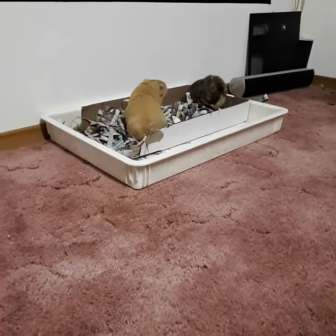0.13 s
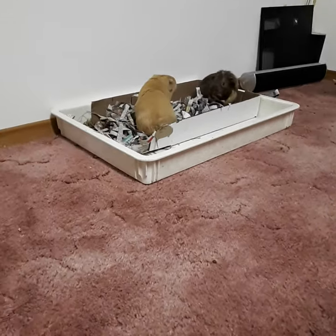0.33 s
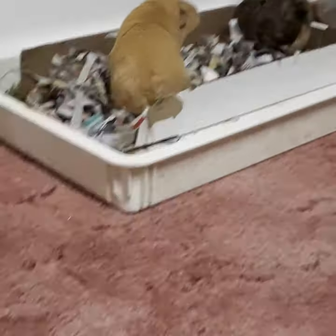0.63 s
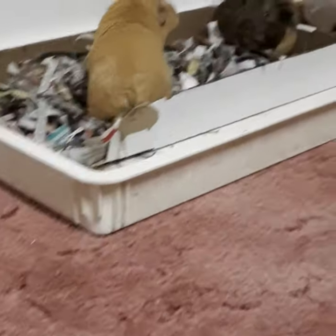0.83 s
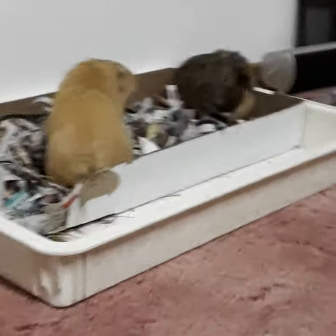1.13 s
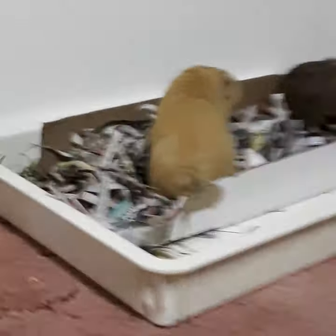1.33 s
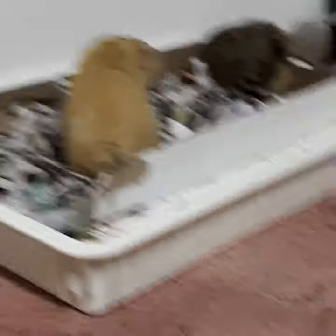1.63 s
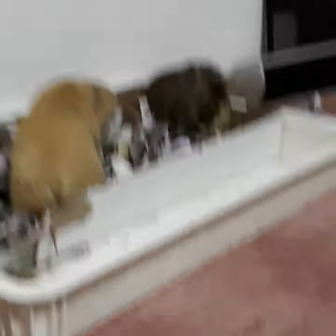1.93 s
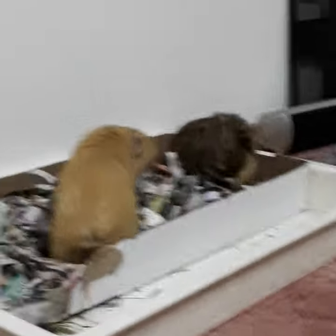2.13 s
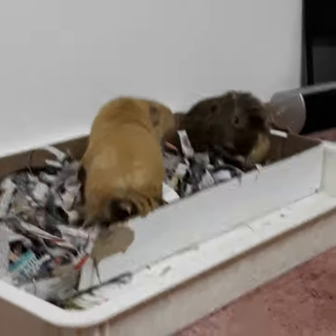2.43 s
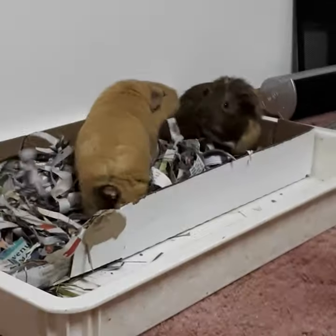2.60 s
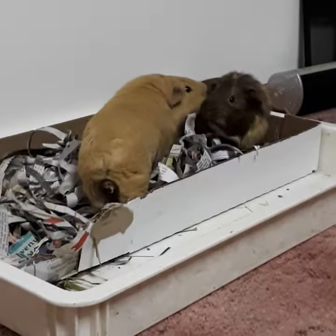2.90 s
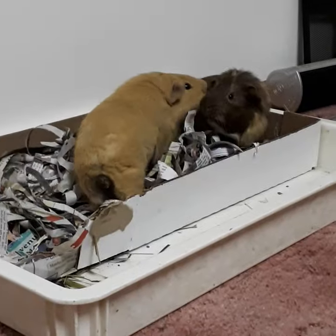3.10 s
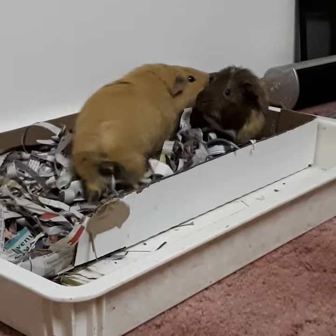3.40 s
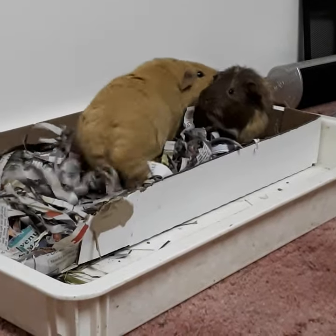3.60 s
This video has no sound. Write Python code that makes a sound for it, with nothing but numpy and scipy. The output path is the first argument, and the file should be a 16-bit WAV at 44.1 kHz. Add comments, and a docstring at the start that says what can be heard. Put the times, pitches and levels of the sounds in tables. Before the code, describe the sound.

Paper rustling and rapid crisp nibbling come from guinea pigs in a plastic tray; tiny snaps first, later little calls and foot bumps, finally a crackling scuffle, over faint indoor rumble and microphone hiss.

```python
"""A quiet carpeted room: two guinea pigs shift about in a plastic tray of shredded newspaper.
Nibbling, roughly ten bites a second, is bursts of fibre grains, each a crisp crunch over a hollow knock.
Grain beds rustle, narrow bands of grains scrape, clicks snap, and a few soft chuts are gliding raspy tones.
Decaying modes ring as the tray is bumped, and the rustle swells at the end as both animals scuffle.
A hand brushes the microphone in a swell of hiss, over rumble, a faint hum and steady hiss."""
import sys
import numpy as np
from scipy import signal
from scipy.fft import rfft, irfft, next_fast_len
from scipy.io import wavfile
from scipy.ndimage import uniform_filter1d, map_coordinates

SR = 44100
rng = np.random.default_rng(int(sys.argv[2]) if len(sys.argv) > 2 else 0)


def to_wav(sig):
    """Store sig (one row per channel, or 1-D mono) as 16-bit WAV at the path in sys.argv[1].

    Samples outside -1..1 are clipped; the rate is SR.
    """
    pcm = np.clip(np.atleast_2d(sig), -1, 1) * 32767
    pcm = np.round(pcm).astype(np.int16)
    wavfile.write(sys.argv[1], SR, pcm.T)  # frames by channels


N = 165375
T = np.arange(N) / SR  # time of each sample [s]


def amp(db):
    """Decibels to gain."""
    return 10 ** (np.asarray(db) / 20)


def unit(x):
    """Scale to rms 1."""
    return x / np.sqrt(np.mean(x ** 2) + 1e-20)


def along(points, hz):
    """Read (frequency [Hz], value) points on a log frequency axis."""
    frequencies, values = np.transpose(points)
    return np.interp(np.log(hz + 1), np.log(frequencies + 1), values)


def level(rows):
    """Gain envelope per sample from (time [s], level [dB]) rows."""
    return amp(np.interp(T, *np.transpose(rows)))


def wobble(rate):
    """A smooth random curve with rate knots a second."""
    knots = rng.standard_normal(int(N * rate / SR) + 4)
    return map_coordinates(knots, [T * rate])


def filtered(x, response):
    """Shape the spectrum of x by a gain that depends on frequency."""
    size = next_fast_len(N + SR // 2)
    spectrum = rfft(x, size) * response(np.fft.rfftfreq(size, 1 / SR))
    return irfft(spectrum, size)[..., :N]


def colour(x, points, size=2048):
    """EQ by a causal, minimum-phase filter of unit energy with the given spectrum."""
    cepstrum = irfft(np.log(amp(along(points, np.fft.rfftfreq(size, 1 / SR)))))
    # folding the cepstrum forward in time makes the filter causal
    cepstrum[1:size // 2] *= 2
    cepstrum[size // 2 + 1:] = 0
    impulse = irfft(np.exp(rfft(cepstrum)))
    return signal.fftconvolve(x, impulse[None] / np.linalg.norm(impulse), axes=1)[:, :N]


def spread(pair, width, left_db):
    """Pan two signals as middle and side; left_db leans the image to the left."""
    mid, side = pair
    balance = amp([[left_db / 2], [-left_db / 2]])
    return np.array([mid + width * side, mid - width * side]) * balance


def grains(rate, scatter_db, smooth):
    """Tiny fibre clicks of uneven size over smooth friction noise, as middle and side."""
    hits = rng.random(N) < rate / SR
    sizes = hits * amp(scatter_db * np.minimum(rng.exponential(size=N), 4))
    clicks = unit(sizes * rng.standard_normal((2, N)))
    return unit(clicks + smooth * rng.standard_normal((2, N)))


def patchy(x, depth_db):
    """Random patches of time and frequency shift the colour from strip to strip."""
    z = signal.stft(x, nperseg=512)[2]
    field = uniform_filter1d(rng.standard_normal(z.shape[1:]), size=7, axis=0)
    field = uniform_filter1d(field, size=9, axis=1)
    return signal.istft(z * amp(depth_db * unit(field)), nperseg=512)[1][:, :N]


def burst(s, attack, hold, t60):
    """Envelope from time s: exponential attack, then release after the hold, all in seconds."""
    t = np.maximum(T - s, 0)
    return (1 - np.exp(-t / attack)) * amp(-60 * np.maximum(t - hold, 0) / t60)


def crumple(depth_db):
    """Fibres give way in clumps a few milliseconds long, with softer gaps between."""
    return unit(amp(depth_db * np.tanh(wobble(260))))


# bites before the layer trims: (time [s], crunch level [dB], hollow knock level [dB])
BITE_TIMES = [(0.014, -54, -69.5), (0.098, -50.5, -70.5), (0.186, -53, -78), (.27, -59, -87),
              (0.35, -54.5, -75.5), (.436, -55.5, -64), (0.495, -56.5, -65.5), (.532, -62, -83),
              (0.628, -57.5, -71), (0.659, -65, -77), (0.731, -54.5, -62.5), (0.826, -53.5, -63),
              (.931, -54, -64), (1.037, -53.5, -65.5), (1.164, -54, -62.5), (1.263, -62, -67),
              (1.379, -55.5, -65), (1.499, -59.5, -66), (1.626, -64.5, -67.5), (1.755, -60.5, -65.5),
              (1.795, -59, -88), (1.865, -58.5, -68), (1.962, -59, -61.5), (2.015, -74, -65),
              (2.069, -57, -66.5), (2.146, -67, -62.5), (2.264, -58, -61.5), (2.36, -56, -65),
              (2.397, -60.5, -82), (2.485, -73, -72), (2.524, -57.5, -69), (2.6, -59, -72),
              (2.641, -59, -68.5), (2.876, -68, -71), (2.98, -69, -63), (3.098, -61, -66),
              (3.213, -58, -62.5), (3.319, -64, -62), (3.427, -58, -65), (3.64, -61, -66),
              (3.68, -70, -64.5)]
# spectrum of the crisp crunch: (frequency [Hz], relative level [dB])
CRUNCH_COLOUR = [(1500, -33.5), (4000, -24.5), (5800, -13.5), (6800, -6.5), (7400, 1), (7950, -4.5),
                 (8700, -17.5), (11000, -23.5), (15800, -13)]
# hollow spectrum, shared by knocks, feet and tray scuffs: (frequency [Hz], relative level [dB])
HOLLOW_COLOUR = [(150, -29.5), (330, -5), (520, 0), (720, 1.5), (1000, -1.5), (1350, -6), (1650, -13),
                 (2500, -21.5), (5000, -31)]


def nibbling():
    """Each bite is a short crunch of tiny fractures with a soft hollow knock."""
    crisp = sum(amp(db) * burst(s, attack=0.0024, hold=0.014, t60=0.2) for s, db, _ in BITE_TIMES)
    dull = sum(amp(db) * burst(s, attack=0.0021, hold=0.022, t60=0.13) for s, _, db in BITE_TIMES)
    crunch = colour(crisp * grains(rate=1800, scatter_db=0, smooth=0.6), CRUNCH_COLOUR)
    knock = colour(dull * grains(rate=2000, scatter_db=-1, smooth=1.0), HOLLOW_COLOUR)
    crunch = amp(-6.5) * spread(crunch, width=0.66, left_db=3.5)
    return crunch + amp(-2.0) * spread(knock, width=0.11, left_db=1.0)


# paper rustle envelopes, middle and treble, before trims: (time [s], level [dB])
RUSTLE_MID_LEVEL = [(0.0, -70), (0.152, -78.5), (0.216, -71), (0.315, -75.5), (0.438, -68.5), (.56, -75),
                    (0.668, -74.5), (0.738, -69), (1.034, -76), (1.05, -75), (1.08, -70), (1.188, -67),
                    (1.226, -70), (1.366, -68.5), (1.372, -74), (1.47, -71.5), (1.504, -65.5), (1.652, -77),
                    (1.846, -68), (1.952, -69.5), (1.988, -64.5), (2.06, -68.5), (2.12, -61.5),
                    (2.27, -65.5), (2.34, -65), (2.432, -70), (2.464, -62), (2.552, -66.5), (2.62, -63.5),
                    (2.694, -69), (2.746, -77), (2.768, -69.5), (2.95, -70.5), (3.06, -75), (3.296, -67),
                    (3.412, -71.5), (3.448, -56), (3.48, -68), (3.606, -56), (3.645, -58), (3.675, -57),
                    (3.694, -60.5), (3.75, -58.5)]
RUSTLE_TREBLE_LEVEL = [(0, -69.5), (.08, -77), (.11, -66), (.17, -64), (.2, -62.5), (.255, -63.5),
                       (.285, -62), (.335, -70), (.36, -66.5), (0.4, -65.5), (0.45, -68), (0.59, -77),
                       (0.68, -67), (0.72, -70.5), (0.85, -67), (0.99, -73), (1.22, -65), (1.4, -67),
                       (1.43, -71.5), (1.7, -78), (1.97, -68), (1.99, -62), (2.04, -69.5), (2.21, -66),
                       (2.44, -70.5), (2.47, -62), (2.55, -67), (2.61, -58), (2.7, -74.5), (2.75, -74),
                       (2.78, -70), (2.85, -72.5), (3.01, -76), (3.04, -66.5), (3.06, -70.5), (3.19, -70.5),
                       (3.23, -63), (3.35, -68.5), (3.4, -71.5), (3.45, -65), (3.505, -65), (3.53, -60.5),
                       (3.59, -58.5), (3.71, -60), (3.75, -65)]
# feet shuffling on the tray floor, before trim: (time [s], level [dB])
SHUFFLE_LEVEL = [(0.0, -76), (0.18, -76.5), (.45, -68.5), (.58, -76), (0.72, -71), (1.07, -74),
                 (1.3, -73.5), (1.6, -71), (1.73, -72.5), (1.86, -64.5), (2.03, -68.5), (2.15, -64.5),
                 (2.22, -64.5), (2.33, -73), (2.44, -66), (2.53, -68), (2.66, -69.5), (2.76, -74.5),
                 (2.92, -78), (3.01, -69), (3.08, -75), (3.17, -75), (3.28, -67), (3.41, -78),
                 (3.54, -65.5), (3.67, -60.5), (3.75, -65)]
# spectra of the middle and treble rustle: (frequency [Hz], relative level [dB])
MID_COLOUR = [(700, -23.5), (1300, -9.5), (2200, -2.5), (3200, -0.5), (4200, 2), (5500, -0.5), (7000, -2),
              (9000, -26.5)]
TREBLE_COLOUR = [(3000, -23.5), (5500, 0), (6600, 3), (7450, 10.5), (7900, 8), (8600, -3.5), (10000, -1),
                 (12000, 1.5), (15800, 3.5)]


def rustle():
    """Shredded paper crinkles under the animals, whose feet shuffle on the tray."""
    mid = patchy(grains(rate=3000, scatter_db=-0.5, smooth=1.0), depth_db=1.5)
    mid = colour(mid, MID_COLOUR) * level(RUSTLE_MID_LEVEL)
    mid = mid * amp(-1.0 + 2.17 * wobble(45)) * crumple(depth_db=0.5)

    treble = colour(grains(rate=3000, scatter_db=-3.5, smooth=2.5), TREBLE_COLOUR)
    treble = treble * level(RUSTLE_TREBLE_LEVEL)
    treble = treble * amp(3.0 + 1.37 * wobble(32)) * crumple(depth_db=1.5)

    feet = colour(grains(rate=700, scatter_db=2, smooth=0.58), HOLLOW_COLOUR)
    feet = feet * level(SHUFFLE_LEVEL) * amp(-5.0 + 1.5 * wobble(25.1))

    paper = spread(mid, width=0.39, left_db=2.0) + spread(treble, width=0.39, left_db=4.5)
    return paper + spread(feet, width=0.052, left_db=-0.7)


# strips scraping, before trim:
# (time [s], length [s], pitch [Hz], half-width of the band [share of pitch], level [dB])
SCRAPE_TIMES = [(0.113, 0.051, 7200, 0.076, -49), (0.191, 0.08, 4000, .12, -60),
                (0.2, 0.12, 1810, 0.14, -62.5), (0.327, 0.044, 6500, .05, -62),
                (0.36, 0.13, 1770, 0.12, -65.5), (0.592, 0.081, 2040, 0.063, -69.5),
                (0.407, 0.11, 2950, 0.095, -58.5), (0.516, 0.064, 4100, .1, -64),
                (0.70, 0.11, 3080, 0.06, -68), (1.05, 0.085, 4430, 0.25, -57.5),
                (1.097, 0.13, 4060, 0.11, -58), (1.365, 0.057, 4100, 0.17, -59.5),
                (1.776, 0.14, 4930, 0.14, -60.5), (1.831, 0.074, 4350, 0.13, -54.5),
                (2.168, 0.12, 1640, 0.12, -63.5), (2.146, 0.091, 3800, 0.072, -61),
                (2.15, 0.28, 2680, 0.085, -62.5), (2.436, 0.075, 4660, 0.15, -56),
                (2.441, 0.05, 1750, 0.017, -63), (2.589, 0.088, 2350, 0.16, -58.5),
                (2.594, .06, 4600, .14, -61.5), (2.615, 0.09, 1760, 0.062, -64),
                (2.914, 0.068, 3540, 0.099, -65.5), (3.23, 0.21, 5050, 0.12, -59.5),
                (3.49, .09, 4870, .1, -61), (3.571, 0.058, 4300, 0.14, -57),
                (3.593, 0.12, 1400, 0.19, -62.5), (3.677, 0.049, 3420, 0.14, -52)]


def scrapes():
    """A strip sliding on another sings briefly in one narrow band of grain noise."""
    out = np.zeros((2, N))
    for s, length, hz, width, db in SCRAPE_TIMES:
        noise = grains(rate=1500, scatter_db=0.5, smooth=0.78)
        band = filtered(noise, lambda f: 1 / (1 + np.abs((f - hz) / (width * hz)) ** 3.3))
        u = np.clip((T - s) / length, 0, 1)  # progress through the scrape
        swell = np.abs(np.sin(np.pi * u ** 0.61)) ** 0.99
        out += amp(db) * unit(band * crumple(depth_db=0)) * swell
    return amp(-6.0) * spread(out, width=0.6, left_db=2.0)


# sharp snaps, and crackles of trodden paper, before trims: (time [s], level [dB])
SNAP_TIMES = [(.0184, -50), (.0314, -53), (.1005, -46), (.1057, -44), (.1845, -41), (.19, -41.5),
              (.1935, -44), (.2697, -40.5), (.2753, -36.5), (.2785, -46), (.3526, -48), (.3604, -45),
              (.4424, -49), (.4978, -49.5), (.6629, -52), (.7427, -52.5), (.828, -51.5), (.8344, -50),
              (.9308, -54)]
CRACKLE_TIMES = [(3.4465, -51), (3.5245, -52), (3.5645, -45), (3.597, -43), (3.618, -47), (3.691, -44.5)]
# spectra of a snap and a crackle: (frequency [Hz], relative level [dB])
SNAP_COLOUR = [(1500, -18), (4500, -27), (6500, -26), (7400, -4), (7900, 4.5), (8800, -10.5), (11000, -15),
               (15800, -20)]
CRACKLE_COLOUR = [(500, -16), (1500, 8.5), (4500, -8), (6300, -27), (7700, -10), (9000, -1.5),
                  (15800, -0.5)]


def snaps(rows, points, t60):
    """A fibre breaks with one click and a short splintering noise tail."""
    clicks = np.zeros((2, N))
    for s, db in rows:
        clicks[:, round(s * SR)] = amp(db + 12.0) * np.array([1, 0.6])  # middle, side
    tail = sum(amp(db - 9.0) * burst(s, attack=0.00079, hold=0.0012, t60=t60) for s, db in rows)
    return colour(clicks + tail * rng.standard_normal((2, N)), points)


def crinkles():
    """Now and then a strip buckles with a separate small tick, following the middle rustle."""
    ticks = colour(grains(rate=90, scatter_db=2.5, smooth=0), CRACKLE_COLOUR)
    return spread(ticks * level(RUSTLE_MID_LEVEL) * amp(-12.0), width=1.0, left_db=-3.0)


# calls, before the rasp: (time [s], length [s], base pitch [Hz], final rise [share of pitch],
# level [dB], overtone relative to the fundamental [dB])
CHUT_TIMES = [(1.652, 0.053, 846, 0.42, -60, -20), (1.734, 0.044, 903, 0.28, -55, -16),
              (1.821, .033, 1015, 0.15, -52, -18), (1.854, 0.034, 1015, 0.098, -63, -16),
              (1.894, 0.035, 930, -0.091, -59, -22), (2.142, 0.05, 745, 0.036, -60.5, -17),
              (2.194, .046, 825, 0.35, -58.5, -28), (2.492, .045, 720, -.02, -63.5, -28),
              (2.542, 0.045, 765, 0.14, -55.5, -28), (2.629, 0.047, 740, 0.26, -61.5, -21),
              (3.237, 0.057, 930, -0.12, -63, -28)]
CHUT_RISE_CURVE = 3.5  # exponent: higher leaves the flick later
CHUT_SAG = 0.047  # share by which the pitch sags before the flick
CHUT_RASP = 0.34  # depth of breathy flutter in the tone


def chuts():
    """Soft, slightly raspy calls that sag, swell and flick at the end, mostly upward."""
    out = np.zeros(N)
    for s, length, hz, rise, db, overtone_db in CHUT_TIMES:
        u = np.clip((T - s) / length, 0, 1)  # progress through the call
        glide = 1 - CHUT_SAG * np.sin(np.pi * u) + rise * u ** CHUT_RISE_CURVE
        pitch = hz * (glide + 0.0126 * wobble(250))
        phase = 2 * np.pi * np.cumsum(pitch) / SR
        swell = np.abs(np.sin(np.pi * u ** 1.1)) ** 0.55
        out += amp(db) * swell * (np.sin(phase) + amp(overtone_db) * np.sin(2 * phase))
    # a complex flutter roughens both loudness and phase
    rasp = 1 + CHUT_RASP * (wobble(420) + 1j * wobble(420)) / 2
    return np.real(signal.hilbert(out) * rasp) * amp([[-0.3], [0.3]])


# foot bumps, before the mode levels and scuff trim: (time [s], level [dB])
BUMP_TIMES = [(0.669, -61), (.828, -56.5), (0.933, -75), (1.762, -59), (1.782, -63), (2.361, -49.5),
              (2.372, -50.5), (2.398, -51), (3.556, -70), (3.684, -60), (3.742, -55.5)]
# resonances of the plastic tray: (frequency [Hz], relative level [dB], decay time t60 [s])
TRAY_MODES = [(171, -8.5, 0.066), (290, -6.5, 0.046), (411, -2, 0.062), (517, 2, 0.064), (676, 3.5, 0.023),
              (895, -9, .04), (1170, -14, .04)]


def bumps():
    """A foot thumps the plastic tray, ringing its modes, and scuffs on over its floor."""
    ring = np.zeros(N)
    for s, db in BUMP_TIMES:
        for hz, mode_db, t60 in TRAY_MODES:
            decay = burst(s, attack=0.0017, hold=0, t60=t60)
            ring += amp(db + mode_db) * decay * np.sin(2 * np.pi * hz * (T - s))
    slide = sum(amp(db) * burst(s, attack=0.0039, hold=0.0057, t60=0.058) for s, db in BUMP_TIMES)
    scuff = colour(slide * rng.standard_normal((2, N)), HOLLOW_COLOUR)
    return ring + amp(-11) * spread(scuff, width=0.16, left_db=-5)


# spectrum of the hand's brush: (frequency [Hz], relative level [dB])
BRUSH_COLOUR = [(3000, -23), (6500, -1), (7800, -2), (9000, -12), (12000, -0.5), (15800, -11)]


def handling():
    """A hand brushes past the right microphone port: one swell of grainy hiss."""
    hiss = colour(grains(rate=5400, scatter_db=2, smooth=1.2), BRUSH_COLOUR)
    hiss = hiss * burst(1.106, attack=0.07, hold=0.18, t60=0.65)
    return amp(-61.0) * spread(hiss, width=0.54, left_db=-6)


# decay of the room tail: (frequency [Hz], decay time t60 [s])
ROOM_DECAY = [(200, 0.12), (2000, 0.31), (8000, 0.24), (15000, 0.12)]


def room(x):
    """A short noise tail from the walls, decaying by frequency and different at each port."""
    hz, t, z = signal.stft(rng.standard_normal((2, SR // 3)), SR, nperseg=256)
    decay = amp(-60 * t / along(ROOM_DECAY, hz)[:, None])
    tail = signal.istft(z * decay, SR, nperseg=256)[1]
    delayed = np.pad(x, ((0, 0), (200, 0)))  # 200 samples of pre-delay
    return signal.fftconvolve(delayed, tail / np.linalg.norm(tail[0]), axes=1)[:, :N]


# room rumble envelope: (time [s], level [dB])
RUMBLE_ENVELOPE = [(0, -73), (1.2, -72), (1.8, -70.5), (2.48, -71), (2.63, -67), (2.9, -72.5), (3.1, -72),
                   (3.22, -71.5), (3.35, -71.5), (3.7, -67.5)]
# spectra of the rumble, before its low-pass, and of the hiss: (frequency [Hz], relative level [dB])
RUMBLE_COLOUR = [(13, -36), (22, -10), (109, 0), (162, 1), (205, -5.5), (330, -12), (430, -38), (730, -120)]
AIR_COLOUR = [(100, -3), (300, -1.5), (700, 2.5), (1500, -6.5), (3000, -10), (6000, -5), (7600, -6.5),
              (9000, -24), (15800, -16.5)]
# hum tones: (frequency [Hz], rms level [dB])
HUM_TONES = [(58, -89.5), (158, -82)]


def background():
    """Low room rumble, a faint hum of drifting phase, and microphone hiss."""
    rumble = filtered(rng.standard_normal((2, N)),
                      lambda f: amp(along(RUMBLE_COLOUR, f)) / (1 + (f / 380) ** 6))
    rumble = unit(rumble) * level(RUMBLE_ENVELOPE)
    hum = np.zeros(N)
    for hz, db in HUM_TONES:
        hum += amp(db) * np.sqrt(2) * np.sin(2 * np.pi * hz * T + 1.0 * wobble(5.67))
    air = amp(-74.0) * colour(rng.standard_normal((2, N)), AIR_COLOUR)
    return spread(rumble, width=0.27, left_db=0.0) + hum + spread(air, width=0.6, left_db=1.0)


def scene():
    """The tray and its animals with their room tail, then the hand and the background."""
    cracks = snaps(SNAP_TIMES, SNAP_COLOUR, t60=0.012)
    cracks = cracks + snaps(CRACKLE_TIMES, CRACKLE_COLOUR, t60=0.0055)
    tray = nibbling() + rustle() + scrapes() + crinkles() + chuts() + bumps()
    tray = tray + spread(cracks, width=1.0, left_db=-5.5)
    return tray + amp(-9) * room(tray) + handling() + background()


TOP_HZ = 15760  # upper band limit [Hz]


def record(dry):
    """The camera keeps nothing above its band limit."""
    return filtered(dry, lambda hz: hz < TOP_HZ)


dry = scene()
out = record(dry)
to_wav(out)
```